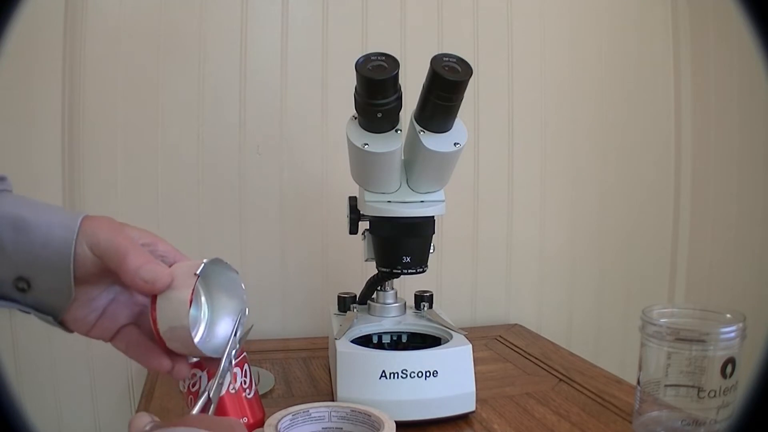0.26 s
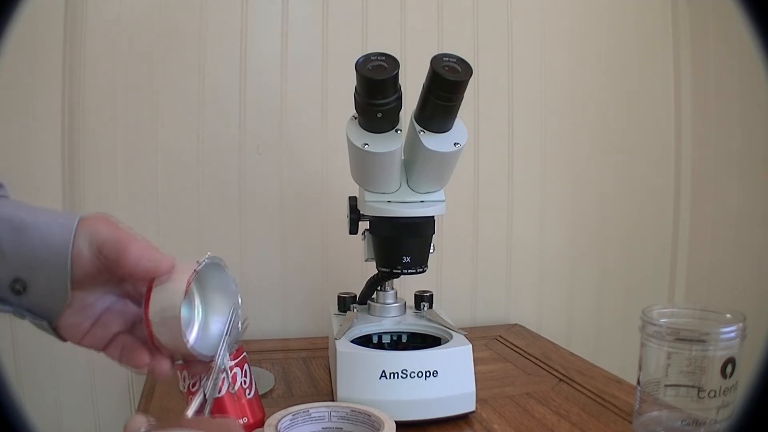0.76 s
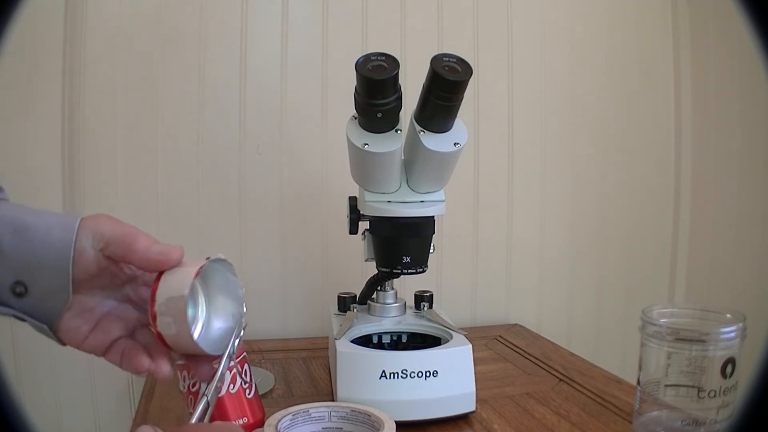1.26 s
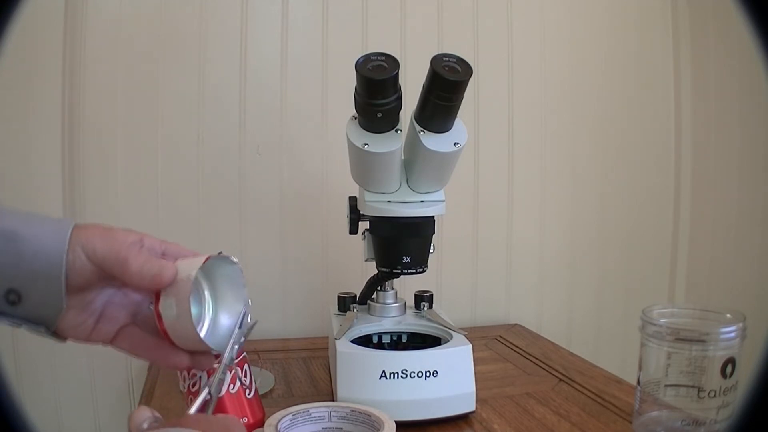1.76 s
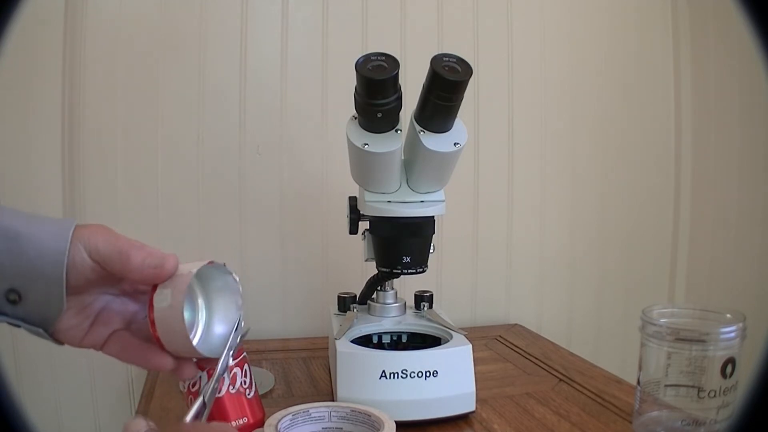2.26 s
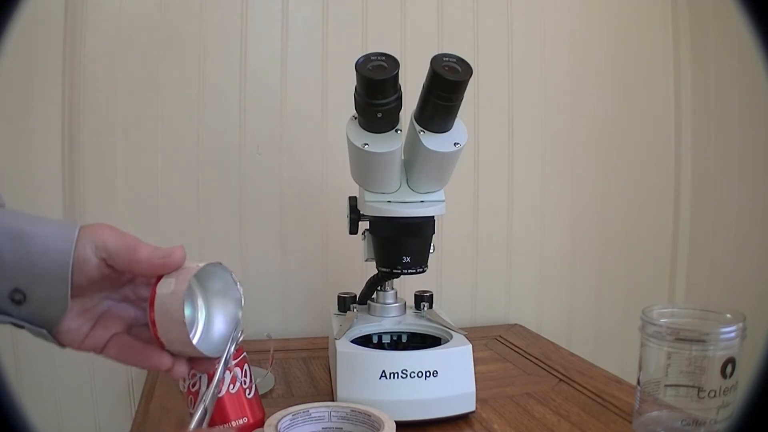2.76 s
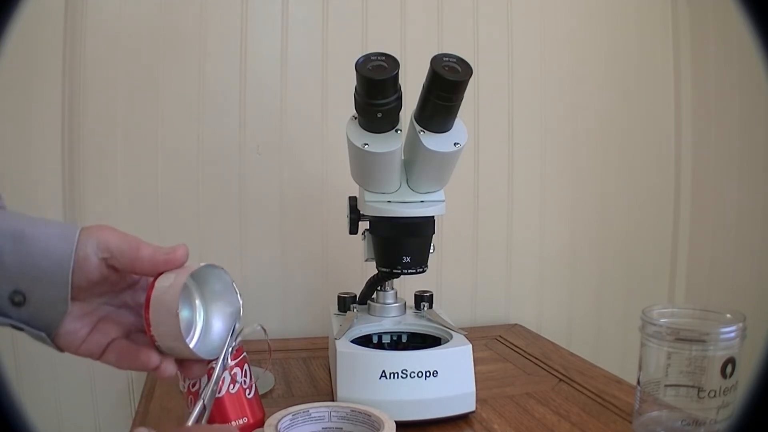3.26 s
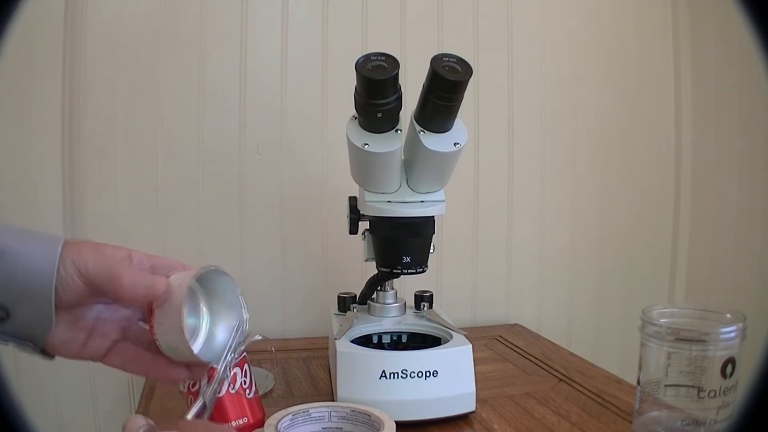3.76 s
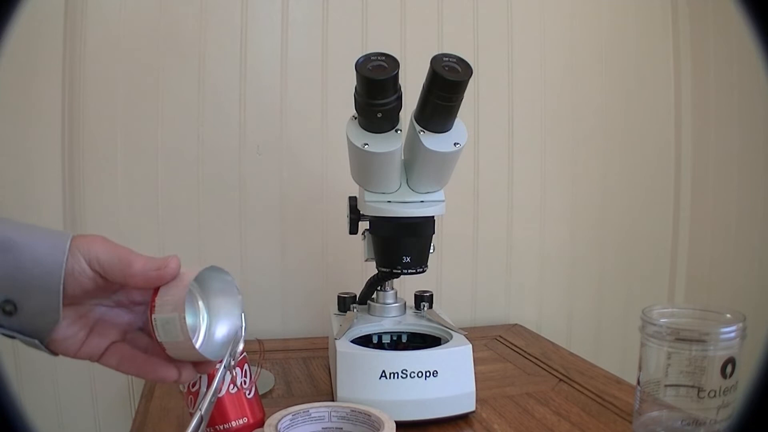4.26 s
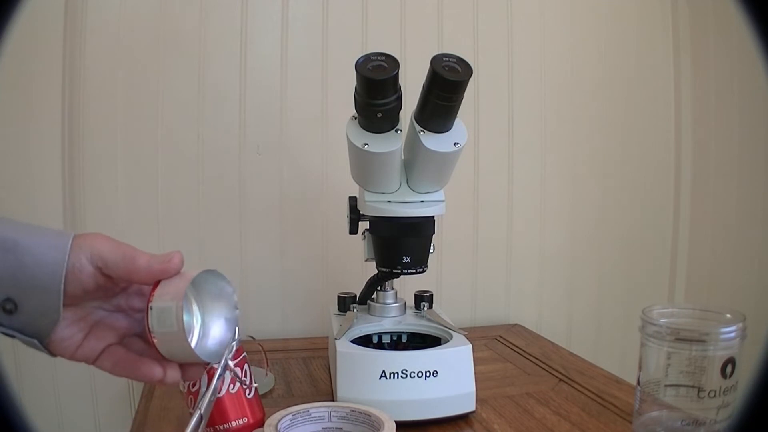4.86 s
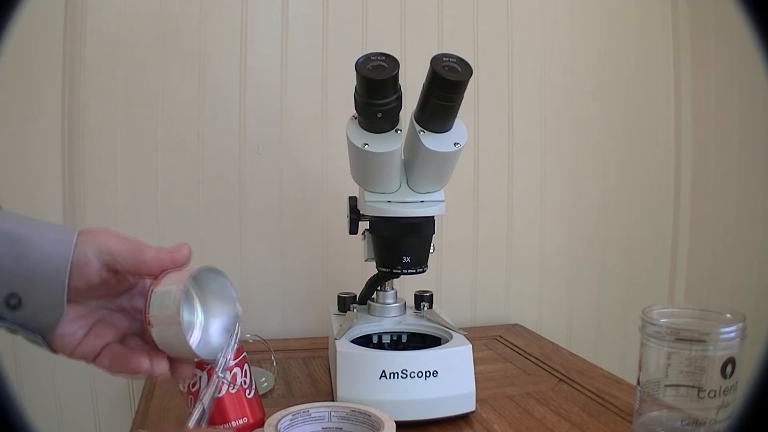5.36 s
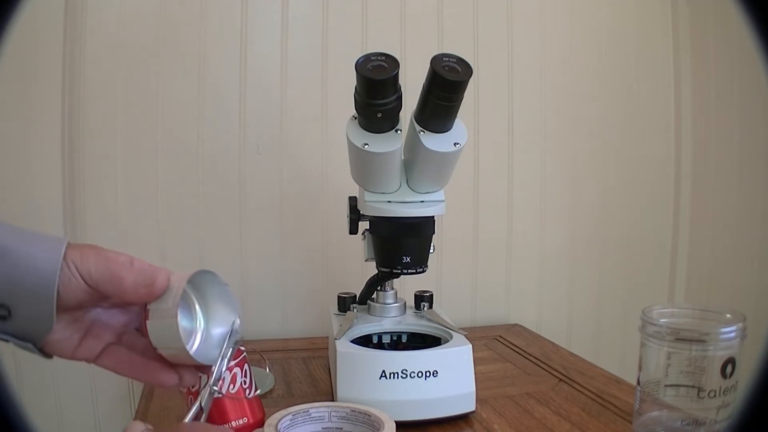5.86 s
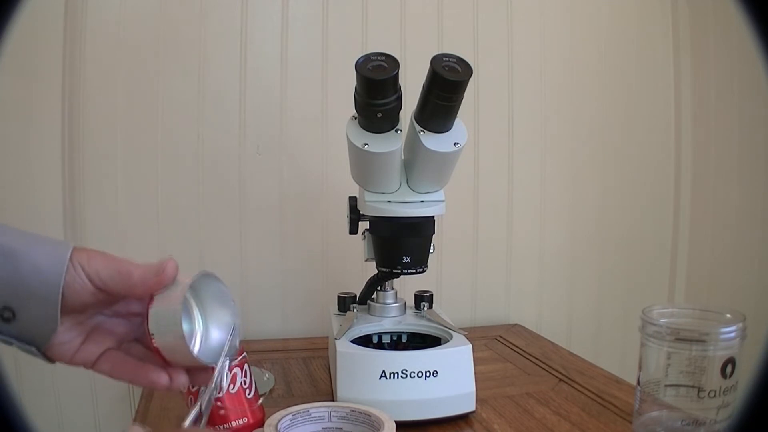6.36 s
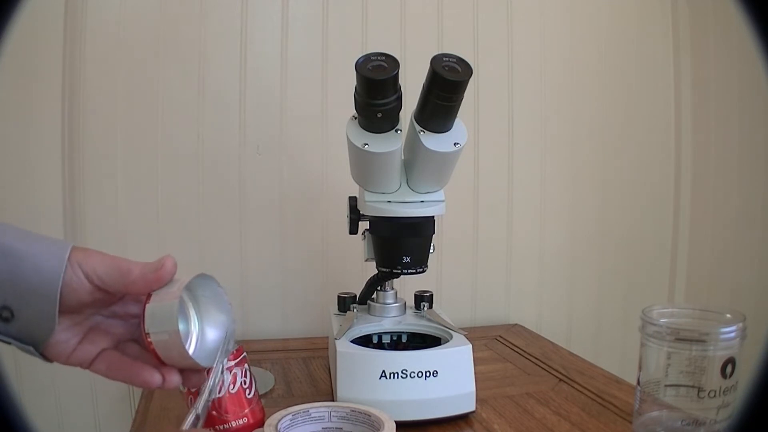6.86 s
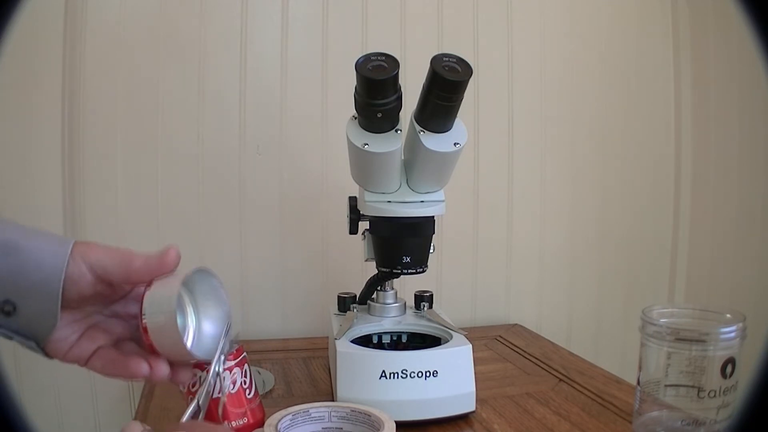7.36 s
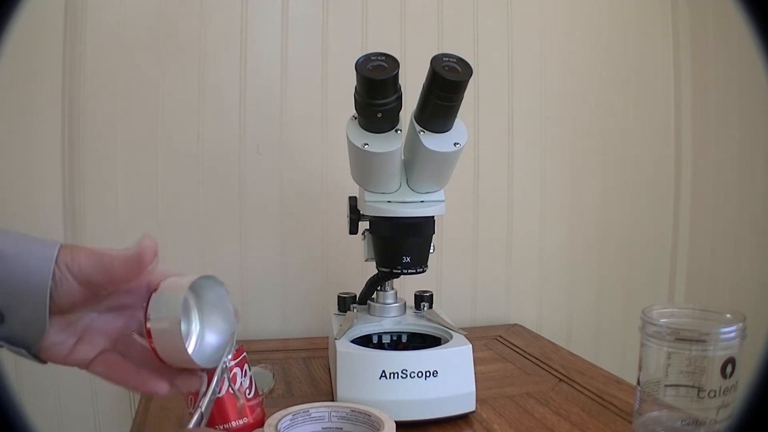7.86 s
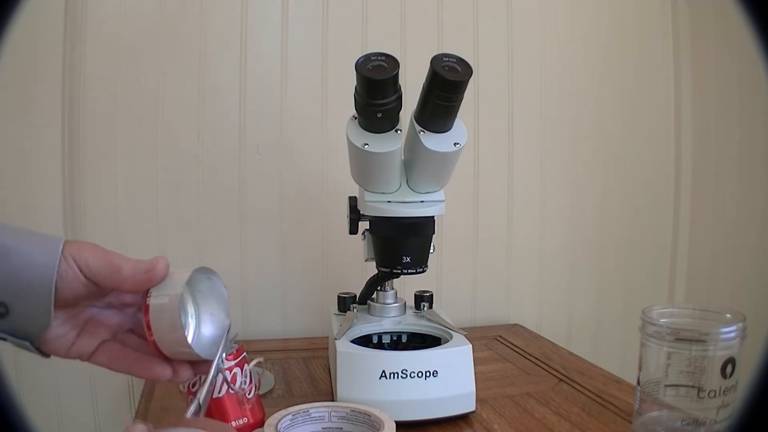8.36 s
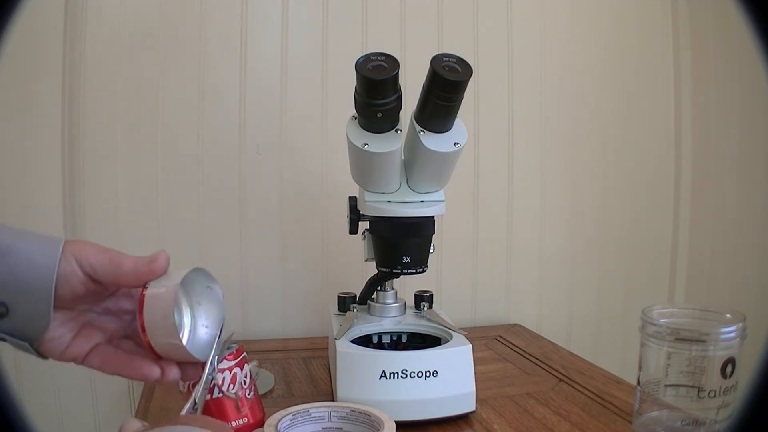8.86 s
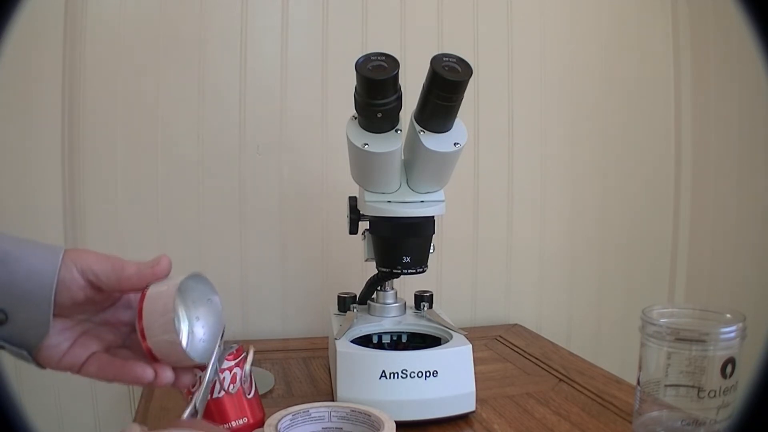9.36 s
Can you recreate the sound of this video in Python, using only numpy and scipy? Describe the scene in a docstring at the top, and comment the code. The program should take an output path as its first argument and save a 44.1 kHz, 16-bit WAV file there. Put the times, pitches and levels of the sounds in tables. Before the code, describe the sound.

Crisp metallic snips through thin can metal come every half second or so, each crunching and ringing briefly, with light blade scrapes between.

```python
"""A quiet room, where small scissors trim the rim of a thin aluminium can a step from the microphone.
Each closing stroke shears the wall: dense bursts of slips ring the can's modes. Opening strokes and
shifts of grip rub the blades along the cut edge: rasping catches ring the blades. The bent sheet snaps
and ticks: short noise blows ring the can. Sparse decaying taps make the room; shaped noise, the hiss."""
import sys
import numpy as np
from scipy import signal
from scipy.fft import rfft, irfft
from scipy.io import wavfile
from scipy.ndimage import uniform_filter1d

SR = 44100
rng = np.random.default_rng(int(sys.argv[2]) if len(sys.argv) > 2 else 0)


def wav_record(signal):
    """Record a signal, one row per channel, as 16-bit PCM in the file named by sys.argv[1]."""
    frames = np.transpose(np.atleast_2d(signal))
    bounded = np.clip(frames, -1, 1)
    # unit amplitude maps onto the largest positive 16-bit level
    quanta = np.round(bounded * 32767).astype(np.int16)
    wavfile.write(sys.argv[1], SR, quanta)


N = 423801

# opening strokes and shifts of grip, levels before the mix: start_s, rise_s, length_s, low_db,
# fall_db (by the end), upper_db (re low), treble_db (re low), flap_pitch_hz
RUB_STROKES = [(.32, 0.017, 0.22, -59, 15, 1, -2.5, 3850), (.46, 0.016, 0.1, -58, 2, 6.5, -3.5, 3850),
               (.585, 0.0065, 0.057, -52.5, 14, 5.5, -3.5, 4000),
               (1.0, 0.0077, 0.13, -58, 3, 1.5, -6, 3570), (1.14, 0.019, 0.12, -60.5, 1, 5, -1, 3870),
               (1.35, .01, 0.069, -80, 7, -10, -3, 3900), (1.645, .006, .03, -64, 1, 7, 2, 3950),
               (1.94, 0.028, 0.11, -52, 10, 1.5, -6.5, 3630), (2.07, 0.047, .16, -51.5, 10, -2.5, -2, 3950),
               (2.46, 0.039, 0.15, -43, 18, -0.5, -7, 3900), (2.605, .01, .23, -54.5, 2, 0, -2, 3930),
               (3.23, .015, 0.36, -58, 5, 3.5, -0.5, 4000), (3.72, 0.021, 0.037, -59.5, -4, 9, -5, 3950),
               (3.84, .01, 0.092, -50, 9, 3.5, 5.5, 3900), (4.0, 0.014, 0.2, -52, 2.5, 0.5, -4, 3730),
               (4.245, 0.0063, 0.082, -51.5, 13, 2.5, -0.5, 4800),
               (4.635, .012, 0.23, -53, 2.5, -1.5, -6.5, 3820),
               (5.25, 0.011, 0.13, -47.5, 13.5, -4, -8, 4000),
               (5.35, .03, 0.088, -50.5, 6.5, 0.5, 1.5, 3750), (5.505, 0.013, 0.2, -48.5, 34, -2, -9, 4080),
               (5.97, .01, 0.14, -52.5, -10.5, -5.5, -18.5, 4050),
               (6.31, 0.033, 0.065, -62.5, 1, 2, 2, 4200), (6.555, 0.057, .13, -59.5, 8, 6, -4, 3900),
               (7.1, 0.054, 0.11, -65.5, 13, 11, 6, 4010), (7.215, 0.091, 0.11, -65.5, 4, 10.5, -5, 4010),
               (7.57, .012, 0.16, -55.5, 9.5, 2, 1, 4030), (7.7, 0.046, 0.084, -53.5, 10, 1, 4.5, 3960),
               (7.84, 0.0087, 0.097, -69, 15, -9, -3, 3950), (8.05, 0.018, 0.064, -55, -4, 10, -9, 3860),
               (8.18, 0.031, .14, -46.5, 24, -8.5, -16, 4000),
               (8.392, 0.0055, .1, -51.5, 22, 5.5, 4.5, 3830), (8.51, 0.046, .1, -59.5, 7, 5, 6.5, 4100),
               (8.982, .01, 0.194, -63, -0.5, 4.5, 3, 4070)]
# resonances of the can: pitch_hz, width_hz, level_db (relative)
CAN_MODES = [(650, 24, -8), (850, 38, -9), (1132, 36, -3), (1990, 23, -5), (2650, 29, -19.5),
             (3260, 77, -5), (3987, 42, -2.5), (4400, 80, -18), (4780, 220, -18.5), (6070, 95, -16),
             (7190, 42, -31), (8000, 104, -17.5), (8700, 25, -19), (9120, 71, -26), (10000, 240, -29.5),
             (12500, 110, -35)]

BELLY_HZ, UPPER_HZ, TREBLE_HZ = 1400, 2700, 5200  # where the belly, low, upper and treble groups meet
# how a rub starts below its peak, lets go, dulls its upper ring and glides in flap pitch
RUB_MOTION = dict(bite_db=10.6, lift_s=0.012, dull_db=1.2, glide_hz=230)


def gain_of(db):
    """Decibels to gain."""
    return 10 ** (np.asarray(db) / 20)


def evened(x):
    """Scales to rms 1."""
    return x / np.sqrt(np.mean(x ** 2) + 1e-20)


def read(points, hz):
    """Reads a table on a log-frequency axis."""
    point_hz, value = np.transpose(points)
    return np.interp(np.log(hz + 1), np.log(point_hz + 1), value)


def held(rows, column):
    """The value of the latest row, kept until the next."""
    table = np.transpose(rows)
    latest = np.searchsorted(table[0], np.arange(N) / SR) - 1
    return table[column][np.maximum(latest, 0)]


def coloured(x, points):
    """Filters by a smooth curve of pitch_hz and level_db."""
    hz = np.linspace(0, SR / 2, 1025)
    taps = signal.firwin2(2049, hz, gain_of(read(points, hz)), fs=SR)
    return signal.oaconvolve(x, taps[None], "same")


def resonate(x, hz, width):
    """A resonance of gain 1 that follows the curve hz: shift to zero pitch, smooth, shift back."""
    turn = np.exp(2j * np.pi * np.cumsum(hz) / SR)
    pole = np.exp(-np.pi * width / SR)
    return 2 * (turn * signal.lfilter([1 - pole], [1, -pole], x / turn)).real


def stressed(x, hz, width, rest, peak_db):
    """The patch of wall beside the blades lifts one pitch out of a mode group."""
    return rest * x + gain_of(peak_db) * resonate(x, hz, width)


def body(modes, broad, broad_db):
    """Causal responses of the belly, low, upper and treble mode groups, each of energy 1."""
    hz = np.fft.rfftfreq(8192, 1 / SR)
    power = gain_of(2 * (read(broad, hz) + broad_db))
    for mode_hz, width_hz, level_db in modes:
        power += gain_of(2 * level_db) / (1 + (2 * (hz - mode_hz) / width_hz) ** 2)
    below = [1 / (1 + (hz / edge) ** 12) for edge in (BELLY_HZ, UPPER_HZ, TREBLE_HZ)]
    group_shares = np.diff([0 * hz, *below, 1 + 0 * hz], axis=0)
    log_gain = .5 * np.log(power * group_shares + 1e-12)
    cepstrum = irfft(log_gain)  # folded onto positive times: minimum phase
    cepstrum[:, 1:4096] *= 2
    cepstrum[:, 4097:] = 0
    taps = irfft(np.exp(rfft(cepstrum)))[:, :4096]
    return taps / np.linalg.norm(taps, axis=1, keepdims=True)


def ring(drive, responses):
    """Each mode group answers its own share of the force."""
    return signal.oaconvolve(drive, responses, axes=1)[:, :N]


def slips(per_s, spread_db, colour_db, slip_ms, fizz):
    """Stick and slip: short tears of chance size over a fine fizz; each tear favours other mode groups."""
    size_db = spread_db * np.minimum(rng.exponential(1, N), 4)
    size = gain_of(size_db) * (rng.random(N) < per_s / SR)
    starts = size * gain_of(colour_db * rng.standard_normal((4, N)))
    pole = np.exp(-1000 / (SR * slip_ms))
    tears = signal.lfilter([1], [1, -2 * pole, pole ** 2], starts)  # each swells, then fades
    return evened((evened(tears) + fizz) * rng.standard_normal(N))


def gusts(shared_db, own_db, size):
    """Wavering pressure of the hand, partly shared by the mode groups, smoothed over size samples."""
    shared, *own = uniform_filter1d(rng.standard_normal((5, N)), size=size)
    return gain_of(shared_db * evened(shared) + own_db * evened(np.array(own)))


def strokes(rows, bite_db, lift_s, dull_db, glide_hz, belly_db=0):
    """Gain of each mode group, and pitch of the free flap, while a blade moves along the metal."""
    gains = np.zeros((4, N))
    for start_s, rise, length, low_db, fall_db, upper_db, treble_db, _, *belly in rows:
        t = np.arange(0, length, 1 / SR)
        push_db = np.interp(t, [0, min(rise, length), length], [-bite_db, 0, -fall_db])
        fade = np.clip(np.minimum(4 * t, length - t) / lift_s, 0, 1)  # quick on, slower off
        push = gain_of(low_db + push_db) * fade
        groups_db = [sum(belly, belly_db) + 0 * t,
                     0 * t,
                     upper_db - dull_db * t / length,
                     treble_db + 0 * t]
        gains[:, round(start_s * SR):][:, :len(t)] += gain_of(groups_db) * push
    start, length, flap_hz = (held(rows, column) for column in (0, 2, 7))
    travel = np.clip((np.arange(N) / SR - start) / length, 0, 1)
    return gains, flap_hz + glide_hz * (travel - .5)


def hiss():
    """Steady air and microphone noise, partly shared by both ports, slightly patchy."""
    # noise spectrum: pitch_hz, level_db (relative, per Hz)
    spectrum = [(18, -66.5), (30, -48.5), (369, -11.5), (432, -9), (467, -9.5), (591, -4.5), (709, -6),
                (830, -4), (1110, -6.5), (1330, -6.5), (1550, -5.5), (2690, -11.5), (3320, -11),
                (11300, -27.5), (15500, -50)]
    # left-right likeness: pitch_hz, likeness (0 to 1)
    likeness = [(100, 0.57), (500, 0.46), (1500, 0.48), (4000, 0.77), (7000, 0.96), (9500, 1)]
    hiss_db = -61.5  # rms of the two ports' mean, ahead of the microphone filter
    frames, hz = N // 256 + 5, np.fft.rfftfreq(1024, 1 / SR)
    a, b, c, d, patches = rng.standard_normal((frames, 513, 5)).T
    patches = uniform_filter1d(patches, size=12, axis=0)
    patches = evened(uniform_filter1d(patches, size=14, axis=1))
    same = np.clip(read(likeness, hz), -1, 1)[:, None]
    left = a + 1j * b
    right = same * left + np.sqrt(1 - same ** 2) * (c + 1j * d)
    z = np.array([left, right]) * gain_of(read(spectrum, hz)[:, None] + 1.05 * patches)
    out = signal.istft(z, nperseg=1024, noverlap=768)[1][:, :N]
    return gain_of(hiss_db) * out / np.sqrt(np.mean(out.mean(0) ** 2))


def room(x):
    """Sparse taps of random sign, each band dying at its own speed; the two ports hear nearly one tail."""
    # decay: pitch_hz, t60_s
    decay = [(300, 0.46), (900, 0.33), (2100, 0.3), (4000, 0.31), (8000, 0.31), (12000, 0.22)]
    # room sound unlike in the two ports: pitch_hz, level_db
    unlike = [(500, -35), (2000, -22.5), (8000, -15.5), (10000, -45)]
    early_db, early_s = 7.5, .015  # the first reflections differ most between the ports
    # three tails blend in slowly turning shares, so the room's fine ringing does not stay fixed
    half_turns_per_s = 2.3
    taps = np.zeros((4, SR // 2))
    at = np.arange(180, SR // 2 - 20, 20) + rng.integers(0, 20, (4, (SR // 2 - 181) // 20))
    np.put_along_axis(taps, at, rng.choice([-1., 1.], at.shape), 1)
    hz, t, z = signal.stft(taps, SR, nperseg=256)
    fading = gain_of(-60 * t / read(decay, hz)[:, None])
    tail = signal.istft(z * fading, SR, nperseg=256)[1]
    tail /= np.linalg.norm(tail[0])
    tail[3] *= gain_of(early_db * np.exp(-np.arange(tail.shape[1]) / SR / early_s))
    turn = np.pi * (half_turns_per_s * np.arange(N) / SR + np.arange(3)[:, None] / 3)
    shares = np.vstack([np.sqrt(2 / 3) * np.cos(turn), np.ones(N)])
    *both, apart = signal.fftconvolve(x * shares, tail, axes=1)[:, :N]
    return sum(both) + coloured(np.array([apart, -apart]), unlike)


def snaps():
    """Sheet snaps and blade knocks build in about a millisecond and rattle on; rubs add chance ticks."""
    # snaps and knocks, levels before the mix: start_s, blow_db, upper_db (re blow), treble_db (re blow),
    # flap_pitch_hz, low_pitch_hz, rattle_ms
    blows = [(0.1052, -26, -5.5, -28, 3340, 1880, 3.9), (0.2394, -31.5, -11, -10, 3840, 1750, 3),
             (0.4738, -33, -17, -16, 3960, 1860, 3), (0.5287, -38, -2, -18, 3920, 1530, 2.8),
             (0.5906, -36.5, -2.5, -19, 3820, 1460, 3.4), (0.7447, -26, -7, -30, 3940, 1900, 2.3),
             (0.7581, -17, 4, -39, 3250, 1800, 3), (0.7803, -8, -16, -28.5, 3930, 1880, 5),
             (0.9171, -30, -17, -23, 3940, 1600, 3.4), (1.0588, -43.5, -9, -14, 3850, 1880, 3),
             (1.3586, -45.5, -10, -5, 3960, 1790, 3), (1.387, -41.5, -15, -12.5, 3800, 2400, 3),
             (1.6701, -26.5, -15.5, -23, 3930, 1550, 3.5), (1.6923, -22, -17, -39, 3350, 1910, 3.4),
             (1.9897, -44, 2, -24, 3840, 1920, 3), (2.0904, -39, -5, -17, 3980, 1930, 2.7),
             (2.3204, -20, -12, -37, 4100, 1920, 3), (2.3341, -11, -15.5, -40, 4000, 1980, 2.7),
             (2.4763, -37, -8, -8.5, 3960, 1930, 2), (2.5018, -32.5, -4, -3, 3900, 2000, 3.4),
             (2.5481, -33, -20, -11.5, 3960, 1570, 3), (2.609, -30, -16, -21, 3880, 1730, 3.3),
             (2.7127, -40.5, -9, -15, 3940, 2010, 3), (2.7835, -42, -12, -12, 3980, 2030, 3),
             (2.9411, -31, -4, -22, 3800, 2030, 2.2), (3.097, -44.5, -1.5, -12, 4000, 1750, 4.8),
             (3.238, -37.5, -8, -17, 3870, 1940, 5.3), (3.2874, -39.5, -4, -17, 3850, 1770, 3.4),
             (3.3058, -41, -8, -3.5, 3530, 1860, 3.3), (3.3438, -43, -15, -1.5, 3890, 2080, 3),
             (3.3904, -38, -10, -7.5, 3930, 1970, 3), (3.497, -36, -21, -12, 3960, 1790, 2.7),
             (3.5199, -36.5, -11, -6.5, 3960, 1850, 3.3), (3.5514, -42, -14, -6, 4000, 1870, 2.7),
             (3.5962, -44, -9, -14, 3970, 1860, 3), (3.7514, -10, -11, -16.5, 3560, 2020, 5),
             (3.7854, -22.5, -15, -27, 3970, 1860, 2.6), (3.8462, -22, -16, -14.5, 3870, 1930, 1.6),
             (4.0547, -30.5, -18, -19, 3920, 2000, 3), (4.2488, -29.5, -16.5, -28, 4320, 1900, 2.2),
             (4.2842, -33.5, -5, -14, 4850, 1890, 2.4), (4.4171, -32, -14, -10, 4000, 1930, 3.5),
             (4.64, -36.5, -6, -18, 3850, 1870, 3.9), (4.996, -26, 0, -25, 3270, 1750, 3.3),
             (5.37, -36, -8, -13, 3940, 2020, 2.5), (5.46, -32, -29, -31, 3770, 1870, 2),
             (5.5119, -29, -15, -14.5, 4810, 2150, 5), (5.5717, -34.5, -10, -12, 4000, 1540, 2.1),
             (5.62, -42, -12, -14, 3980, 1560, 3), (5.7457, -17.5, -18.5, -20.5, 3920, 1980, 3.9),
             (5.7773, -13, -14, -17.5, 4100, 2040, 2.3), (5.9239, -38.5, -7, -18, 3940, 1830, 2.6),
             (5.9774, -27.5, -26, -27, 4100, 2010, 2.3), (6.0237, -33, -11, -22, 4600, 1850, 3.4),
             (6.0446, -26, -17, -22.5, 3680, 1630, 3), (6.0773, -18.5, -14, -27, 4180, 1950, 3.7),
             (6.1664, -20, -19.5, -40, 3900, 2080, 3.6), (6.3724, -20.5, -20, -12, 4140, 2050, 3),
             (6.5989, -34.5, -13, -30, 3980, 2030, 3), (6.9659, -16, -3, -9.5, 3960, 1910, 3.3),
             (7.3213, -35, -4, -18, 4000, 1920, 3), (7.342, -15, -11.5, -36, 3970, 1970, 2),
             (7.5767, -35.5, -9, -20, 4020, 2040, 3.3), (7.592, -32, -12, -22, 3940, 1630, 3.4),
             (7.7532, -35.5, -3, -17, 3980, 2040, 3), (7.8537, -37.5, -8.5, -11.5, 3980, 1850, 3.9),
             (7.8762, -38, -21, -8.5, 4800, 1550, 3.5), (7.9108, -37, -15, -8, 3120, 2340, 3),
             (7.9592, -45.5, -12, -5.5, 3040, 2200, 2.4), (8.086, -13, -19, -10, 4150, 2000, 2.1),
             (8.2159, -26.5, -13.5, -20, 4100, 2010, 3), (8.305, -41, -9.5, -12.5, 4000, 2070, 2.3),
             (8.3946, -31.5, -10, -12, 3660, 1590, 4.6), (8.546, -38, -9, -16, 4070, 2070, 2.3),
             (8.7276, -23, -22, -24, 3820, 1980, 3), (8.8752, -44, -8, -10, 4040, 1980, 3),
             (9.005, -43, -6, -15, 3950, 2060, 3), (9.0356, -47, -6, -11, 3960, 1880, 3),
             (9.0633, -43, -12, -14, 3980, 2060, 3), (9.1127, -41, -13, -13, 3680, 1980, 3),
             (9.3527, -35, -23, -27, 3960, 1980, 3)]
    # broad part of a blow: pitch_hz, level_db (relative, per Hz)
    crack = [(120, -76), (200, -50), (922, -14.5), (1980, -5.5), (2540, -13.5), (3890, -6), (5650, -16),
             (6070, -11), (6640, -17), (8210, -9.5), (9300, -22.5), (12800, -31), (14000, -35)]
    belly_db, low_db = -26, -10.5  # re blow
    t, drive = np.arange(1200) / SR, np.zeros((4, N + 1200))
    noises = rng.standard_normal((len(blows), len(t)))
    for (start_s, blow_db, upper_db, treble_db, *_, rattle_ms), noise in zip(blows, noises):
        rattle = noise * (1 - np.exp(-t / 0.00075)) * np.exp(-t * 1000 / rattle_ms)
        group_db = blow_db + np.array([belly_db, low_db, upper_db, treble_db])
        blow = gain_of(group_db)[:, None] * rattle / np.linalg.norm(rattle)
        drive[:, round(start_s * SR):][:, :len(t)] += blow
    ticks = slips(per_s=60, spread_db=3.0, colour_db=5.0, slip_ms=0.7, fizz=0)
    rub_gains, _ = strokes(RUB_STROKES, **RUB_MOTION, belly_db=-20.5)
    ticks = ticks * gain_of(-27) * rub_gains
    belly, low, upper, treble = ring(drive[:, :N] + ticks, body(CAN_MODES, crack, broad_db=-1.0))
    low = stressed(low, held(blows, column=5), width=160, rest=0.75, peak_db=4.0)
    upper = stressed(upper, held(blows, column=4), width=340, rest=0.27, peak_db=5.0)
    return belly + low + upper + treble


def rubs():
    """The blades drag along the burr: a rasp of small catches, gusting with the grip."""
    # resonances of the blades: pitch_hz, width_hz, level_db (relative)
    blade_modes = [(1150, 110, -17.5), (1910, 280, -6), (3560, 150, 0), (3964, 53, 2), (4600, 120, -10),
                   (6060, 97, -19), (7290, 280, -2.5), (8750, 130, -34)]
    # broad scrape: pitch_hz, level_db (relative, per Hz)
    scrape = [(410, -52.5), (700, -24), (1280, -3), (1950, 7), (2400, -16.5), (2940, -34), (3950, -22),
              (4270, 0), (7410, -12), (15000, -41.5)]
    gains, flap_hz = strokes(RUB_STROKES, **RUB_MOTION, belly_db=-22)
    catches = slips(per_s=310, spread_db=0.0, colour_db=4.0, slip_ms=1.6, fizz=0.59)
    drag = evened(catches * gusts(shared_db=-2.0, own_db=3.5, size=600))
    belly, low, upper, treble = ring(gains * drag, body(blade_modes, scrape, broad_db=-5.5))
    upper = stressed(upper, flap_hz, width=370, rest=0.52, peak_db=3.2)
    return belly + low + upper + treble


def cuts():
    """The wall gives way in dense, lumpy tears that ring the can."""
    # closing strokes, levels before the mix: start_s, rise_s, length_s, low_db, fall_db (by the end),
    # upper_db (re low), treble_db (re low), flap_pitch_hz, belly_db (re low)
    closings = [(.09, 0.022, 0.083, -35, 3.5, -0.5, -7.5, 3570, -9.5),
                (.738, 0.026, 0.066, -30.5, -0.5, 1, -12, 2970, -10.5),
                (1.665, 0.029, 0.11, -40.5, 9, -1.5, -6.5, 3700, -6),
                (2.312, 0.025, 0.073, -28, 8.5, -1, -9.5, 3670, -13),
                (2.93, 0.026, 0.074, -36.5, 5.5, -1, -3.5, 3800, -7.5),
                (3.748, 0.013, 0.076, -32.5, 2, -15, -17, 3720, -14.5),
                (4.385, 0.011, 0.089, -44, -3.5, -1.5, -3, 3910, -5.5),
                (4.988, 0.024, 0.074, -34, 1.5, 1, -7, 3820, -4.5),
                (5.734, 0.061, 0.095, -34, 6, -3.5, -6, 3870, -9.5),
                (6.157, 0.0068, 0.047, -40.5, 4.5, -4.5, -12.5, 4040, -17),
                (6.365, 0.014, 0.1, -47.5, 1, 4, 4.5, 3920, 0.5),
                (7.31, 0.042, 0.077, -34, 1.5, -2.5, -9.5, 3980, -18.5),
                (8.08, 0.009, 0.064, -36.5, 11, -8, -18, 3840, -13.5),
                (8.71, 0.035, 0.079, -31.5, 18, -3.5, -8.5, 4020, -12.5),
                (9.335, 0.026, 0.094, -40, 7.5, -5, -6.5, 3900, -4.5)]
    # broad crack of the wall: pitch_hz, level_db (relative, per Hz)
    wall = [(88, -83.5), (150, -38), (477, -23), (661, -8.5), (1110, -8), (1300, -12.5), (1870, 1),
            (2500, -9), (3150, -11.5), (3970, -14), (5100, -26), (8250, -29.5), (15000, -69)]
    gains, flap_hz = strokes(closings, bite_db=14.5, lift_s=0.0084, dull_db=2.1, glide_hz=60)
    tears = slips(per_s=700, spread_db=1.0, colour_db=0.5, slip_ms=0.52, fizz=1.0)
    crunch = evened(tears * gusts(shared_db=0.0, own_db=2.0, size=300))
    belly, low, upper, treble = ring(gains * crunch, body(CAN_MODES, wall, broad_db=2.5))
    upper = stressed(upper, flap_hz, width=660, rest=0.43, peak_db=6.1)
    return belly + low + upper + treble


def scene():
    """Mixes the metal slightly left of centre, its room sound and the hiss."""
    # room sound re direct: pitch_hz, level_db
    wet = [(500, -3.5), (2000, -5), (4000, -7), (8000, -6), (12000, -4)]
    metal = gain_of(-2.5) * cuts() + gain_of(-6.0) * rubs() + gain_of(18.0) * snaps()
    direct = metal * gain_of([[.3], [-.3]])
    return direct + coloured(room(metal), wet) + hiss()


def record(dry):
    """A small microphone, weak in the bass and the top treble, then the band limit."""
    # microphone response: pitch_hz, level_db
    microphone = [(30, -21), (80, -5), (140, -13.5), (230, -2.5), (12500, -1), (14000, -8.5), (15500, -25)]
    edge_hz = 15600
    heard = coloured(dry, microphone)
    low_pass = signal.firwin(511, edge_hz, window=("kaiser", 9), fs=SR)
    return signal.oaconvolve(heard, low_pass[None], "same")


dry = scene()
out = record(dry)
wav_record(out)
```